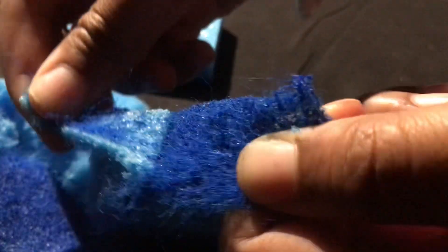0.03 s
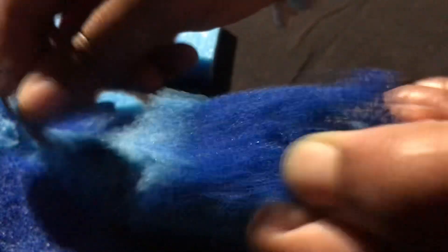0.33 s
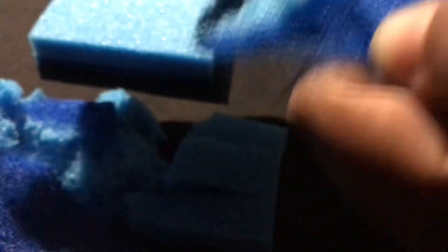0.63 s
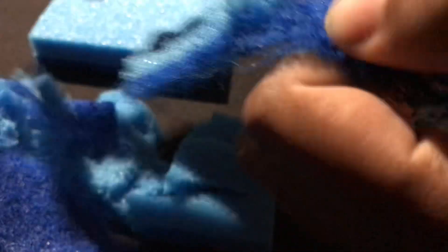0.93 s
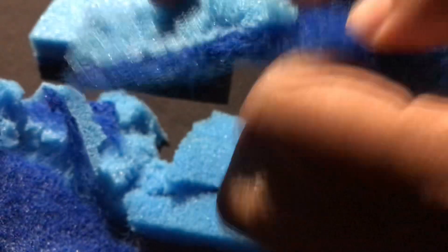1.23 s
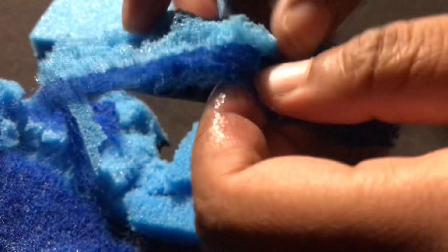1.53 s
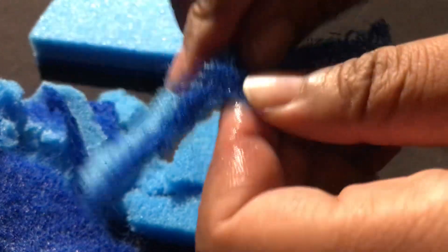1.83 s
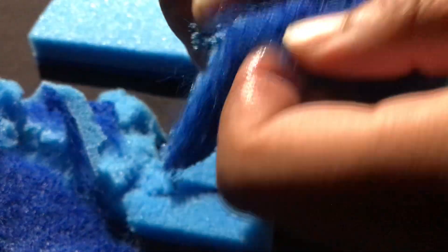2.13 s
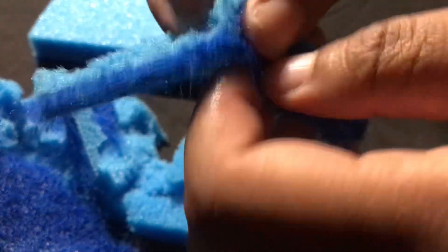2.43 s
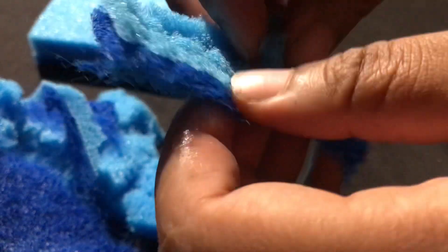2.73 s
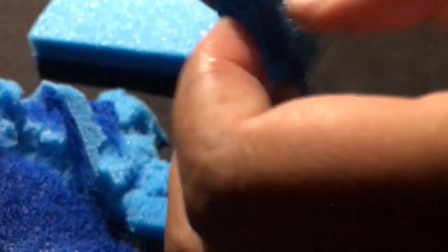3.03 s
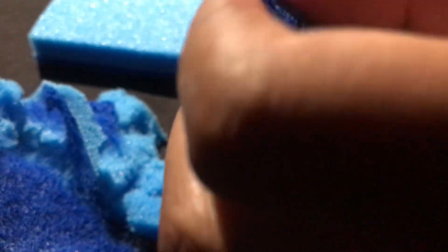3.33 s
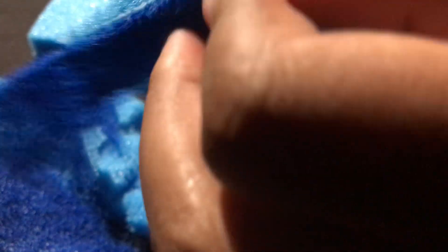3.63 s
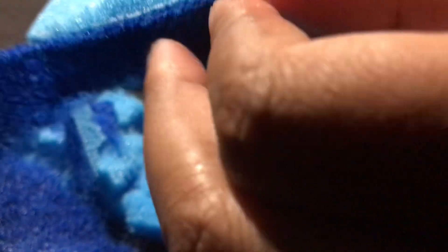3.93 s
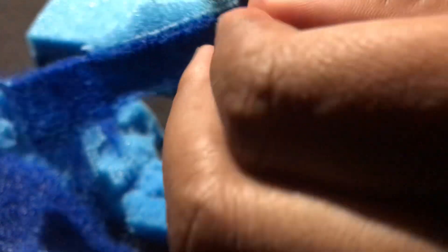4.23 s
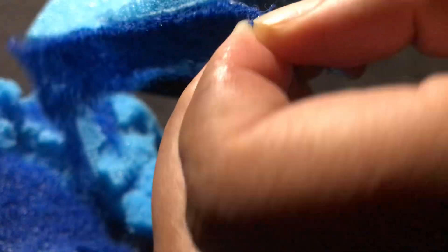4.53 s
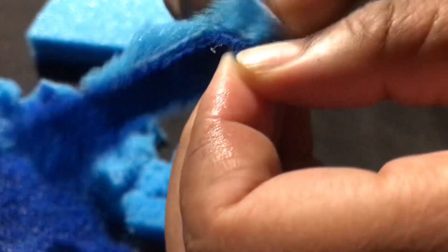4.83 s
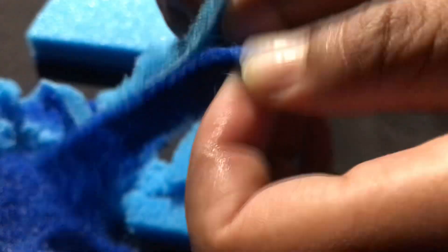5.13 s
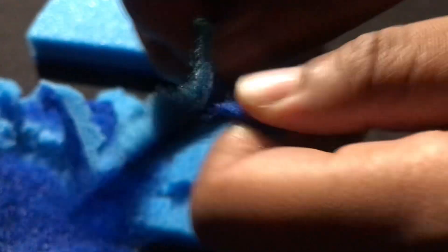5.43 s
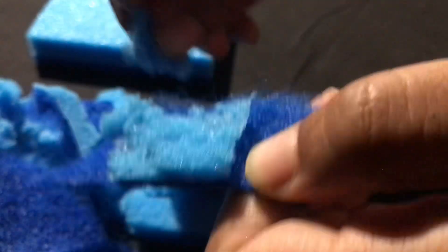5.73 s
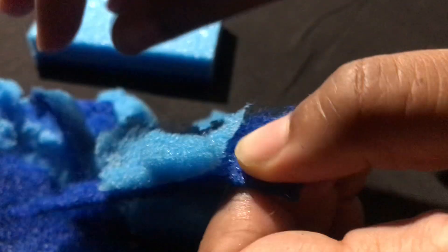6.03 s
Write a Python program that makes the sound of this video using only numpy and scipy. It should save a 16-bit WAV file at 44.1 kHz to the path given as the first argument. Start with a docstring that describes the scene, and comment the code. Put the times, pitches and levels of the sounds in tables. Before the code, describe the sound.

In a small room, a fan keeps up a low hum, a rush of air and a thin metallic chirr. Right at the microphone, hands tear a foam scouring pad in one quick, crisp burst. Several quieter seconds of light finger rubbing and occasional tiny snaps follow. About five seconds in comes a small crackle, then another short, bright rip, leaving the fan and a faint rub.

```python
"""A scouring sponge pulled apart by hand, close to the microphone, in a small room with a fan further off.
It opens on a short rip: a train of breaking fibres and foam cell walls, thin ones bright, thick ones duller.
Then fingers rub softly over the foam, and a few lone fibres snap, near 2 s and again around 4 s.
At 5 s the pad starts to give, and half a second later comes the second rip.
Behind it all, to the end, the fan hums and rushes and its dry bearing chirrs."""
import sys
import numpy as np
from scipy import signal
from scipy.fft import rfft, irfft
from scipy.io import wavfile
from scipy.ndimage import uniform_filter1d

SR = 44100
rng = np.random.default_rng(int(sys.argv[2]) if len(sys.argv) > 2 else 0)


def store_pcm(level_fs):
    """Save levels as 16-bit WAV."""
    pcm = np.round(np.clip(level_fs, -1, 1) * 32767).astype(np.int16)
    wavfile.write(sys.argv[1], SR, np.atleast_2d(pcm).T)


N = 276948
T = np.arange(N) / SR
HZ = np.maximum(np.arange(N // 2 + 1) * SR / N, 1)


# Close-up tone of a thin fibre, a thick fibre and the foam's fine cell walls: frequency_hz, gain_db
THIN_FIBRE_TONE = [(300, -46), (3000, -19), (6500, -11.5), (9300, -7), (11000, -2.5), (13000, -0.5),
                   (15000, 1), (17000, -10)]
THICK_FIBRE_TONE = [(150, -5), (500, -4), (1300, -1.5), (1900, 0), (3100, 2), (3700, -1), (4400, -0.5),
                    (6300, 0.5), (8500, -0.5), (11000, -4.5), (16000, -14)]
CELL_WALL_TONE = [(500, -27.5), (2500, -19.5), (4200, -11), (6500, -8), (9200, -2), (11500, -1.5),
                  (13000, 1), (15000, 0.5), (17000, -10.5)]

def sponge():
    """Right at the microphone: fibres snap, cell walls rip, the taut pad ticks and fingers rub."""
    snap_tick, snap_body = snaps(recoil_ms=1.0, recoil_db=-15.5)
    rip_cells, rip_body = rips(build_db=13, thicken_db=8)
    taut_ticks = pulls(ticks_per_s=60)
    rub = rubbing(grip_db=-68)
    thin = colour(snap_tick + taut_ticks, THIN_FIBRE_TONE)
    thick = colour(snap_body + rip_body + undb(-10.5) * rub, THICK_FIBRE_TONE)
    cells = colour(rip_cells + rub, CELL_WALL_TONE)
    return scatter(thin + thick + cells + pops(), tail_ms=1.4, tail_db=-19.5)


# The loudest single fibres: start_s, level_db, body_re_tick_db
FIBRE_SNAPS = [(0.0734, -20, -9), (0.0923, -12.5, -6), (0.1267, -24, -12), (0.1408, -7.5, -4.5),
               (0.1651, -2, -18), (0.1778, -2, -14), (0.2106, -0.5, -5), (0.2378, -14.5, 5),
               (0.262, -6, -3), (0.2654, -10, -4), (0.2927, -4, -8), (0.3104, -6, -10), (0.3243, -3, -2),
               (0.3318, -9, 0), (0.336, -14, -1), (0.345, -18, 2.5), (1.9884, -16, -14), (2.0333, -16, -6),
               (3.9905, -31, -14), (4.2843, -27, -9), (4.3745, -15, -17), (4.8975, -27.5, 5),
               (4.9526, -19, -12), (4.9626, -5.5, -18), (4.969, -10, -18), (4.977, -8.5, -21),
               (5.0087, -12, -20), (5.0193, -15, -11), (5.363, -18, -33), (5.3788, -14, -9),
               (5.3928, -5, -14), (5.4381, 2, -20), (5.496, 0, -7), (5.5112, -2.5, -5.5),
               (5.5235, -20, 1.5), (5.5301, -11, -1)]

def snaps(recoil_ms, recoil_db):
    """A fibre parts and its loose end recoils through its neighbours: a bright tick, a duller body."""
    tick, body = np.zeros((2, N))
    age_ms = 1000 * T[:256]
    for start_s, level_db, body_db in FIBRE_SNAPS:
        pulse = undb(recoil_db) * rng.standard_normal(len(age_ms)) * np.exp(-age_ms / recoil_ms)
        pulse[0] = rng.choice([-1, 1])  # the break itself
        at = int(start_s * SR) + np.arange(len(pulse))
        tick[at] += undb(level_db) * pulse
        body[at] += undb(level_db + body_db) * pulse
    return tick, body


# Runs of tearing, two to a rip: start_s, peak_s, end_s, peak_db, fall_db, starting_body_re_cells_db
TEAR_RUNS = [(0.137, 0.175, .25, -22, 20, -13), (0.262, 0.264, .322, -27.5, 9, -12.5),
             (4.955, 4.984, 5.025, -37.5, 12, -26), (5.384, 5.448, 5.475, -18.5, 8, -17.5)]

def rips(build_db, thicken_db):
    """The tear breaks cell walls faster as the force grows; thin fibres go first, so the body gains."""
    force, body = np.zeros((2, N))
    for start_s, peak_s, end_s, peak_db, fall_db, body_db in TEAR_RUNS:
        span = slice(int(start_s * SR), int(end_s * SR))
        contour_db = [peak_db - build_db, peak_db, peak_db - fall_db]
        force[span] = undb(np.interp(T[span], [start_s, peak_s, end_s], contour_db))
        progress = (T[span] - start_s) / (end_s - start_s)
        body[span] = force[span] * undb(body_db + thicken_db * progress)
    breaks_per_s = 7500 * (force / undb(-19.5)) ** .9
    crackle = clicks(breaks_per_s, spread_db=8.5)
    return crackle * force, crackle * body


# Flaps of foam freed by the tear: start_s, pitch_hz, level_db, decay_ms
FLAP_POPS = [(.176, 1260, -26.5, 4.1), (.324, 680, -28.5, 3.7), (.324, 1420, -28.5, 1.7),
             (5.496, 520, -41, 3.8), (5.511, 905, -31, 0.83)]

def pops():
    """A flap springs back with a hollow pop: a few cycles, heavily damped by the foam."""
    out = np.zeros(N)
    t = T[:SR // 10]
    for start_s, pitch_hz, level_db, decay_ms in FLAP_POPS:
        envelope = undb(level_db) * np.exp(-1000 * t / decay_ms)
        out[int(start_s * SR) + np.arange(len(t))] += envelope * np.sin(2 * np.pi * pitch_hz * t)
    return out


# Spells when the pad is held taut: start_s, end_s, level_db
TAUT_SPELLS = [(.07, .14, -51), (1.96, 2.065, -51), (3.6, 4.06, -63.5), (4.4, 4.62, -60.5),
               (4.88, 5.054, -52), (5.3, 5.75, -67)]

def pulls(ticks_per_s):
    """Lone fibres give with faint ticks while the pad is stretched."""
    tension = sum(undb(db) * ((T >= start_s) & (T < end_s)) for start_s, end_s, db in TAUT_SPELLS)
    return clicks(ticks_per_s, spread_db=3.5) * tension


# Finger strokes across the foam: middle_s, length_s, level_db
FINGER_STROKES = [(.25, 0.15, -44.5), (0.622, 0.19, -60), (.92, 0.19, -62), (1.257, 0.068, -50),
                  (1.48, .12, -60), (1.8, 0.27, -61.5), (2.007, 0.096, -46.5), (2.25, 0.076, -53.5),
                  (2.484, 0.11, -53.5), (2.78, 0.056, -55), (3.0, 0.067, -60), (4.516, .06, -60),
                  (5.212, .13, -50), (5.474, 0.056, -28), (6.22, 0.14, -60)]

def rubbing(grip_db):
    """Fingers slide over the fine grain, each stroke swelling and fading above the faint steady grip."""
    power = undb(grip_db) ** 2
    for middle_s, length_s, level_db in FINGER_STROKES:
        swell = np.exp(-2 * ((T - middle_s) / length_s) ** 2)
        power += (undb(level_db) * swell) ** 2
    grain = clicks(per_s=8300, spread_db=7.0)
    return grain * np.sqrt(power) * undb(2.9 * wander(per_s=50))


def scatter(x, tail_ms, tail_db):
    """A break reaches the microphone directly, then scattered by the fingers and the table."""
    t = T[:SR // 20]
    tail = rng.standard_normal(len(t)) * np.exp(-1000 * t / tail_ms)
    response = undb(tail_db) * tail / np.linalg.norm(tail)
    response[0] = 1  # the direct path
    return signal.fftconvolve(x, response)[:N]


# The fan's strongest mains tone, swelling and fading: time_s, level_db
MAINS_LEVEL = [(0, -41.5), (.9, -45.5), (1.3, -47), (2.15, -49), (2.85, -41.5), (4.7, -43.5), (5.7, -49),
               (6.28, -44.5)]
# Its other shaft, blade and mains tones: pitch_hz, level_db, unsteadiness_ratio
MOTOR_TONES = [(58.9, -53.5, 0.03), (89.6, -46, 0), (117.2, -54.5, 0), (169.2, -52.5, 0.14),
               (183.1, -49.5, 0.09), (251.7, -54, 0.37), (253.4, -68, 0), (334, -68, 0.6),
               (360.7, -51.5, 0.18), (414.4, -64, 0.7), (938, -63, 0.26), (996, -65.5, 0.52),
               (1103, -72.5, 1), (1224, -74, 0), (1535, -71.5, 0.04), (1599, -74.5, 0.65)]

def fan_hum(mains_tone_hz, waver_db):
    """Further back in the room, the fan's motor hums in slightly unsteady tones."""
    mains_db = level_curve(MAINS_LEVEL) + waver_db * wander(per_s=4.2)
    hum = undb(mains_db) * np.sin(2 * np.pi * mains_tone_hz * T)
    for pitch_hz, level_db, unsteadiness in MOTOR_TONES:
        phase = 2 * np.pi * (pitch_hz * T + rng.random())
        waver = unsteadiness * wander(per_s=7.7) * np.cos(phase + rng.random())
        hum += undb(level_db) * (np.sin(phase) + waver)
    return np.sqrt(2) * hum  # rms to peak


# The fan's air as it sounds from the microphone's position: frequency_hz, density_db_per_hz
AIR_RUMBLE = [(20, -99), (40, -88), (52, -77), (68, -79), (85, -63), (100, -71), (125, -64.5), (156, -72),
              (178, -66), (220, -66.5), (290, -72.5), (308, -76), (345, -69), (450, -99), (900, -125)]
AIR_RUSH = [(200, -101), (480, -81.5), (560, -80.5), (720, -82.5), (980, -81), (1400, -86.5), (1950, -94.5),
            (2500, -91), (3000, -99.5), (3800, -103), (5200, -106), (7500, -111), (13000, -109),
            (17000, -111)]

def fan_air():
    """Moving air makes a low rumble and a higher rush that flutters slightly."""
    low, high = rng.standard_normal((2, N)) * np.sqrt(SR / 2)
    return colour(low, AIR_RUMBLE) + colour(high, AIR_RUSH) * undb(.5 * wander(per_s=31))


# The bearing's main and upper metal resonances: pitch_hz, width_hz, weight_db
MAIN_MODES = [(2180, 11, -15.5), (2286, 20.5, 2), (2314, 7.5, 5), (2220, 26, -19.5), (2344, 33, -0.5),
              (2245, 190, -15.5)]
UPPER_MODES = [(3033, 20, -11), (3120, 21, -9.5), (3190, 22, -5.5), (3322, 71, -6), (3400, 38, -11)]
# How loud each group rings at the microphone: time_s, level_db
MAIN_RING_LEVEL = [(0, -53), (.4, -54), (.8, -50), (1, -49.5), (1.22, -46.5), (1.5, -49.5), (1.75, -55.5),
                   (2.03, -56), (2.26, -48), (2.6, -56.5), (4.2, -55), (4.38, -49.5), (5.06, -49.5),
                   (5.2, -53), (5.6, -57), (6.02, -53), (6.15, -48)]
UPPER_RING_LEVEL = [(.3, -65.5), (1.25, -61), (3.05, -64.5), (3.3, -70), (4.8, -66), (5.15, -62),
                    (5.7, -64.5), (6.2, -61.5)]

def fan_bearing(shaft_hz, throb, steadiness):
    """The dry bearing rubs harder once a turn; friction keeps the metal ringing and limits its swell."""
    out = np.zeros(N)
    for modes, levels in ((MAIN_MODES, MAIN_RING_LEVEL), (UPPER_MODES, UPPER_RING_LEVEL)):
        friction = rng.standard_normal(N) * (1 + throb * np.sin(2 * np.pi * shaft_hz * T))
        metal = sum(undb(db) / np.sqrt(width_hz) / (1 + 1j * (HZ - pitch_hz) / width_hz) ** 2
                    for pitch_hz, width_hz, db in modes)
        chirr = unit_rms(irfft(rfft(friction) * metal, N))
        swell = np.sqrt(uniform_filter1d(chirr ** 2, size=5000))
        out += unit_rms(chirr / swell ** steadiness) * undb(level_curve(levels))
    return out


def clicks(per_s, spread_db):
    """Random clicks of uneven size, with mean power 1."""
    chance = np.clip(per_s / SR, 1e-6, 1)
    sizes = unit_rms(undb(spread_db * np.clip(rng.standard_normal(N), -2, 2)))
    signs = rng.choice([-1, 1], N)
    return (rng.random(N) < chance) * sizes * signs / np.sqrt(chance)


def wander(per_s):
    """Smooth random drift of rms 1 that changes about per_s times a second."""
    return unit_rms(irfft(rfft(rng.standard_normal(N)) / (1 + (HZ / per_s) ** 2) ** 2, N))


def colour(x, points):
    """Causal filter through points of frequency_hz, gain_db."""
    hz, db = np.transpose(points)
    gain = undb(np.interp(np.log(HZ), np.log(hz), db))
    cepstrum = irfft(np.log(gain), N)
    cepstrum[1:N // 2] *= 2  # minimum phase: nothing rings ahead of a click
    cepstrum[N // 2 + 1:] = 0
    return irfft(rfft(x) * np.exp(rfft(cepstrum)), N)


def level_curve(points):
    """Points of time_s, level_db joined by straight lines."""
    return np.interp(T, *np.transpose(points))


def undb(db):
    """Decibels to gain."""
    return 10 ** (np.asarray(db) / 20)


def unit_rms(x):
    """Scale to rms 1."""
    return x / np.sqrt(np.mean(x ** 2))


def scene():
    """One microphone in a small room: the sponge close by, the fan further off."""
    near = sponge()
    far = fan_hum(mains_tone_hz=240, waver_db=1.0) + fan_air()
    far += fan_bearing(shaft_hz=59.0, throb=0.51, steadiness=0.56)
    return (near + far)[None]


# Response of the microphone's port: frequency_hz, gain_db
MIC_PORT = [(4400, 0), (5000, -3.5), (5800, -0.5), (9700, -2), (10450, -6.5), (11500, -2)]

def record(dry):
    """The microphone's port cuts two dips in the treble, and the recorder cuts off above 16 kHz."""
    lowpass = signal.ellip(10, .2, 70, 16000, fs=SR, output="sos")
    return signal.sosfilt(lowpass, colour(dry[0], MIC_PORT))[None]


dry = scene()
out = record(dry)
store_pcm(out)
```